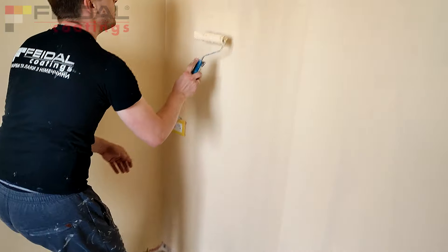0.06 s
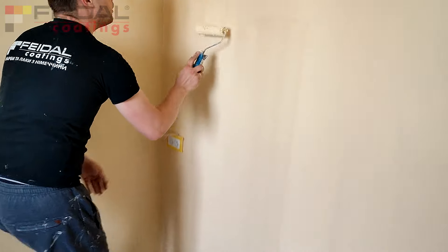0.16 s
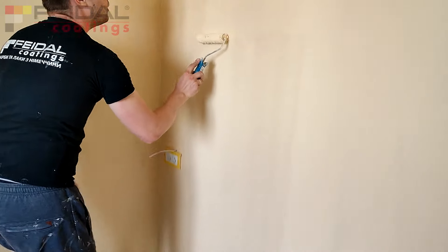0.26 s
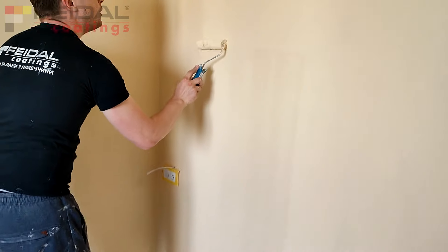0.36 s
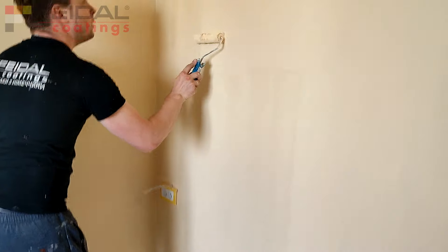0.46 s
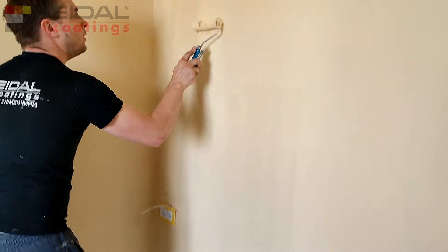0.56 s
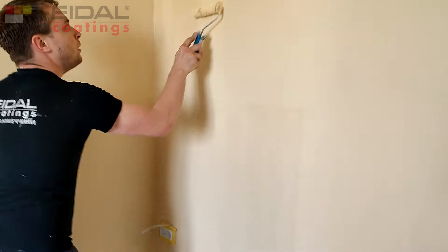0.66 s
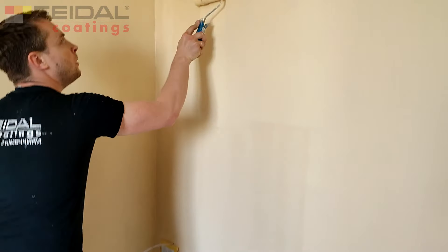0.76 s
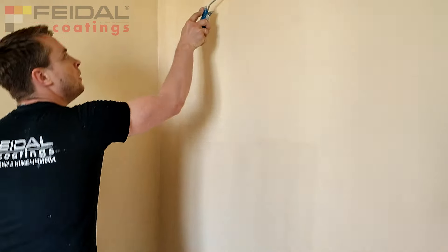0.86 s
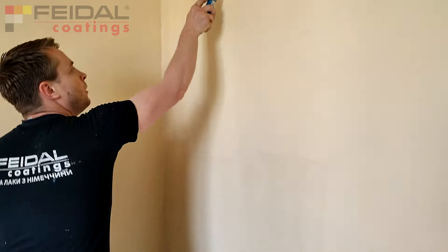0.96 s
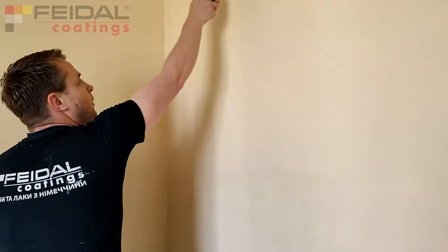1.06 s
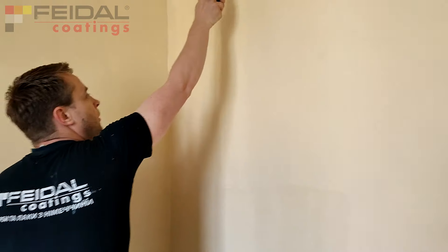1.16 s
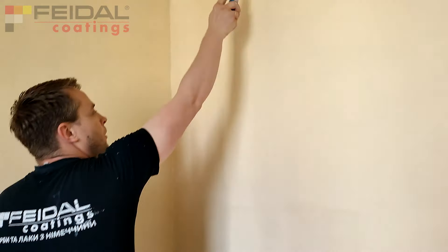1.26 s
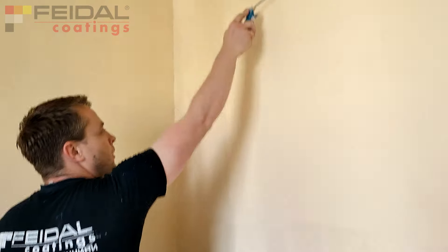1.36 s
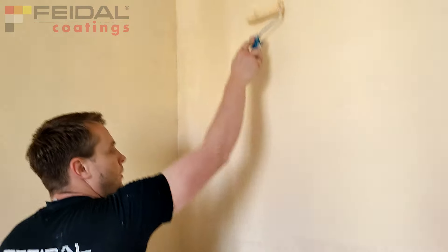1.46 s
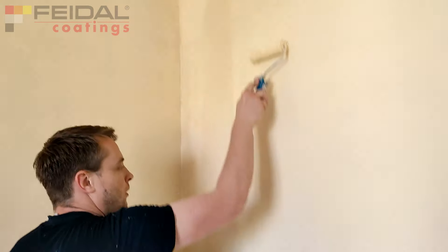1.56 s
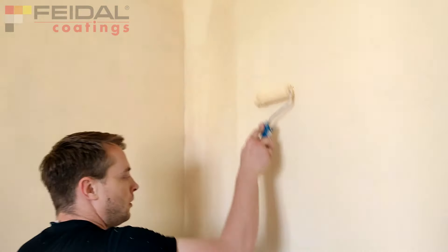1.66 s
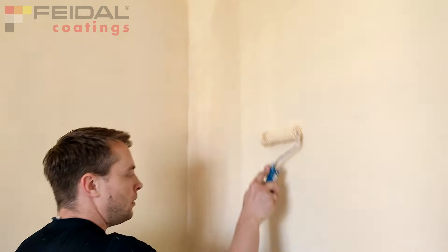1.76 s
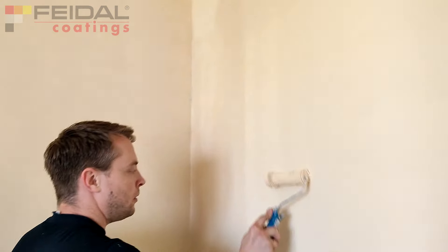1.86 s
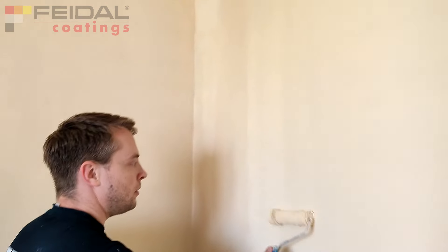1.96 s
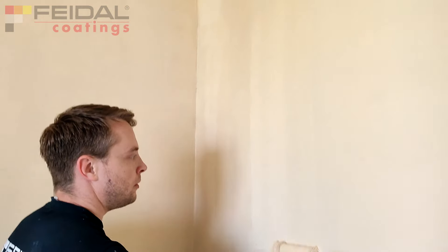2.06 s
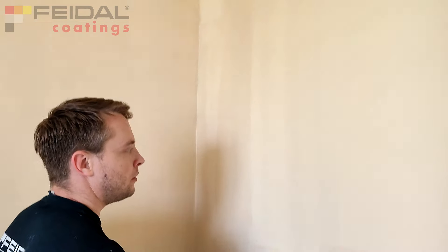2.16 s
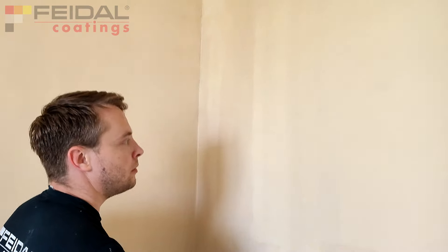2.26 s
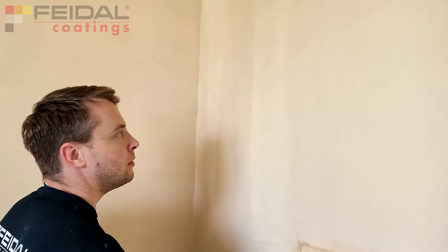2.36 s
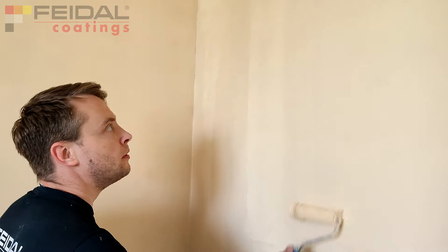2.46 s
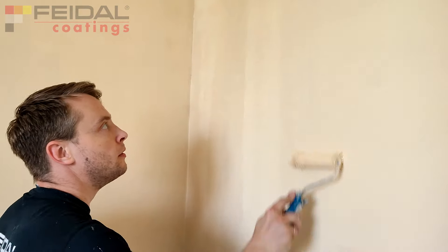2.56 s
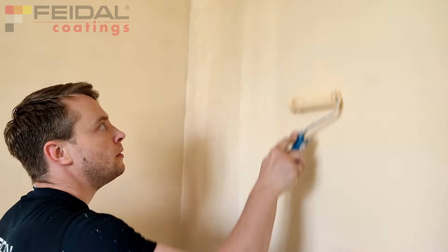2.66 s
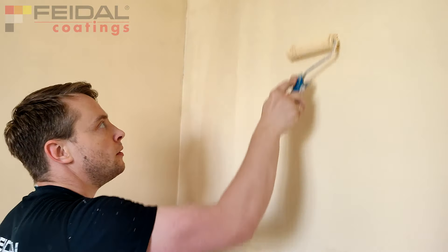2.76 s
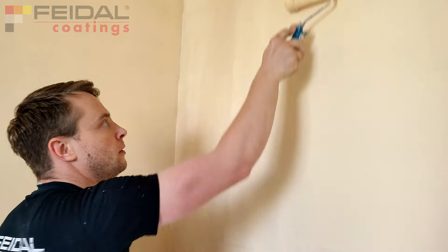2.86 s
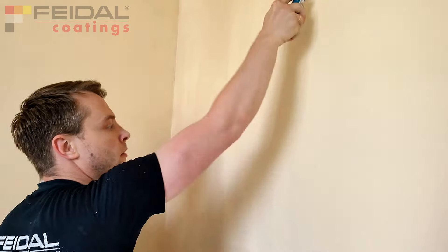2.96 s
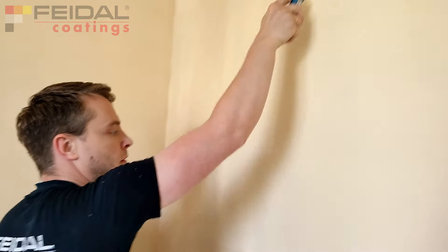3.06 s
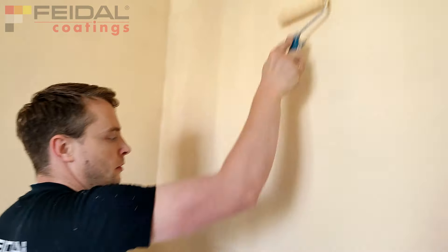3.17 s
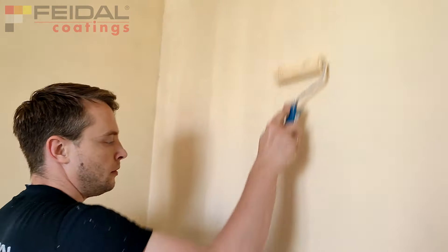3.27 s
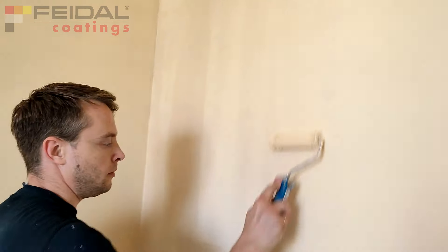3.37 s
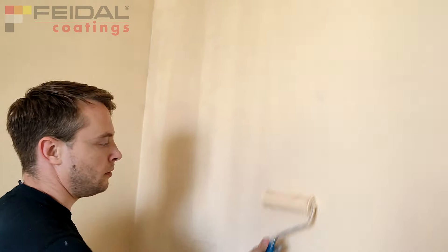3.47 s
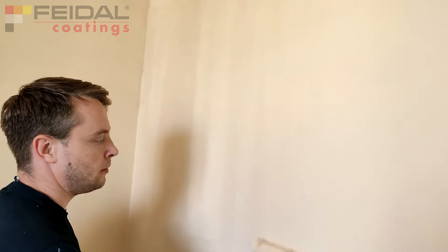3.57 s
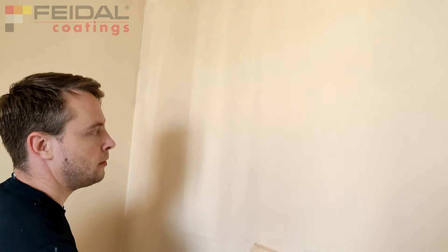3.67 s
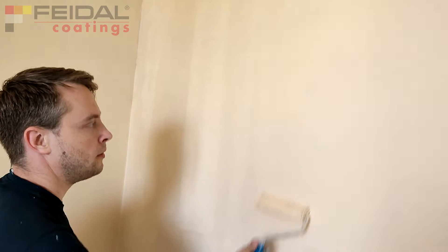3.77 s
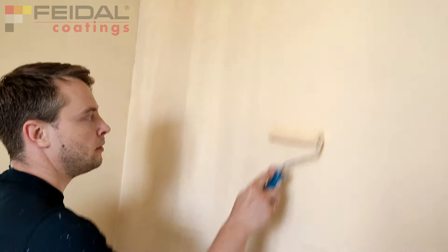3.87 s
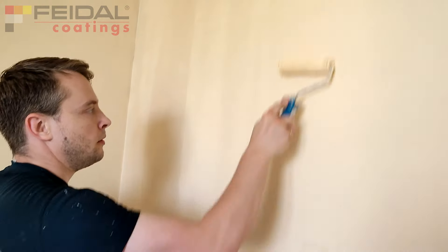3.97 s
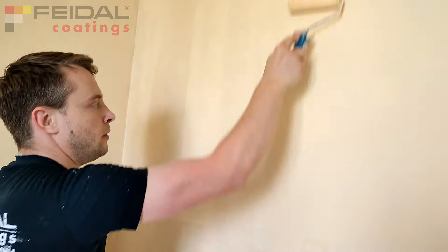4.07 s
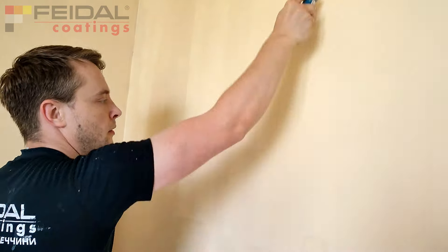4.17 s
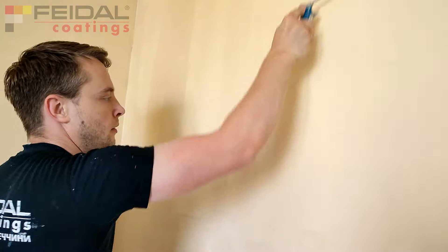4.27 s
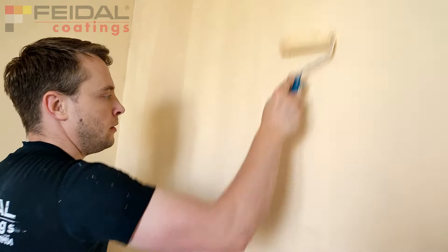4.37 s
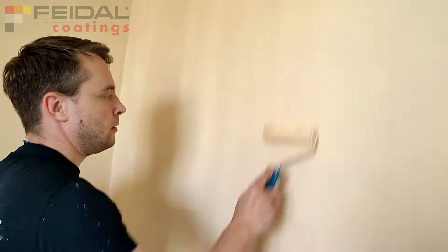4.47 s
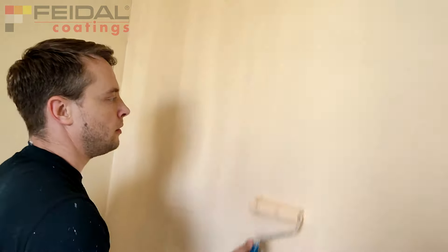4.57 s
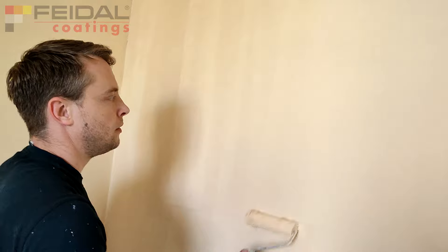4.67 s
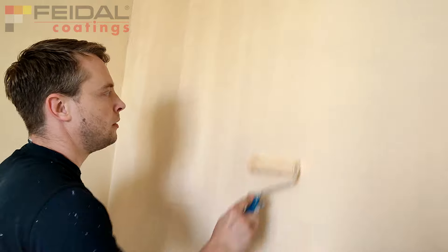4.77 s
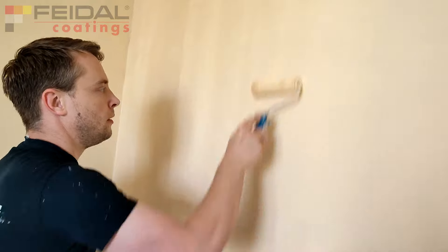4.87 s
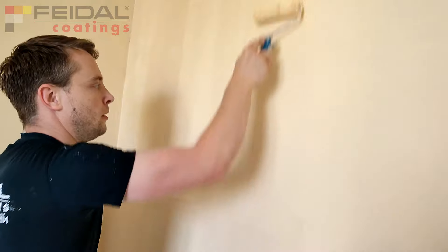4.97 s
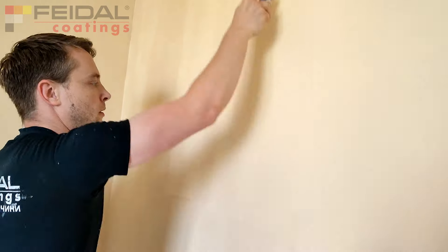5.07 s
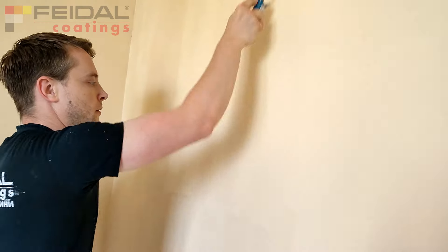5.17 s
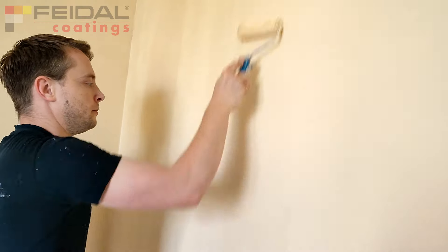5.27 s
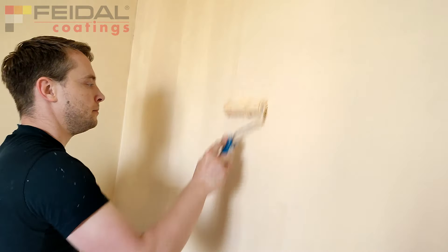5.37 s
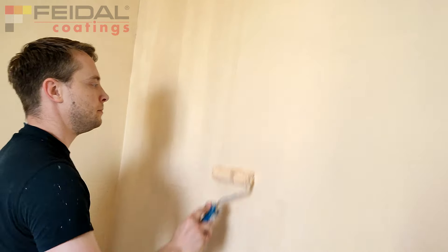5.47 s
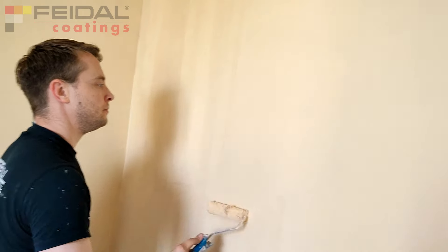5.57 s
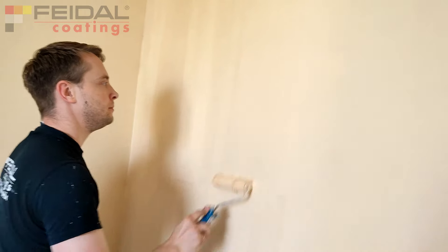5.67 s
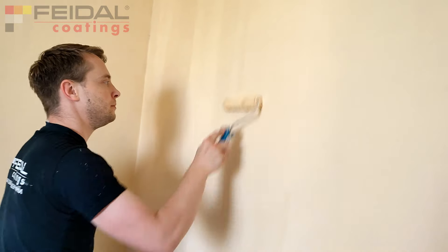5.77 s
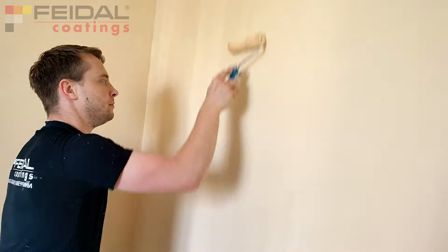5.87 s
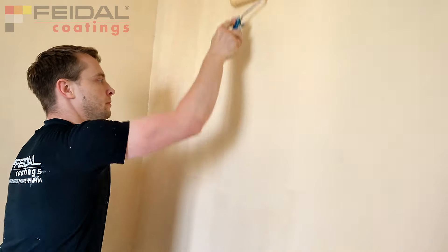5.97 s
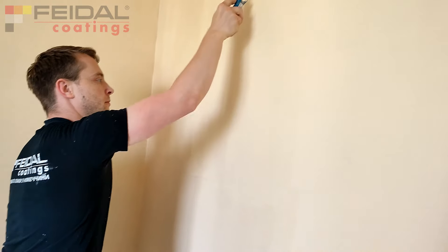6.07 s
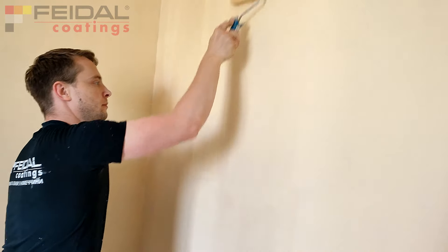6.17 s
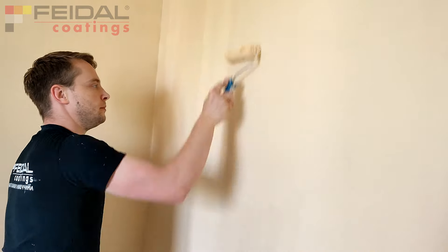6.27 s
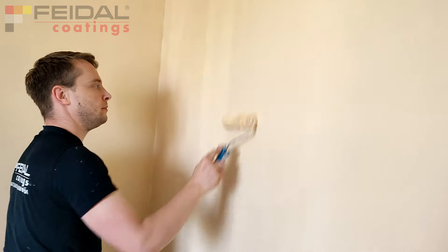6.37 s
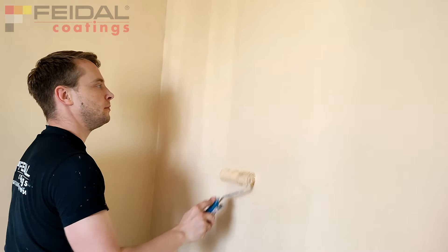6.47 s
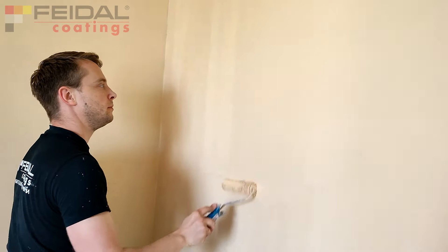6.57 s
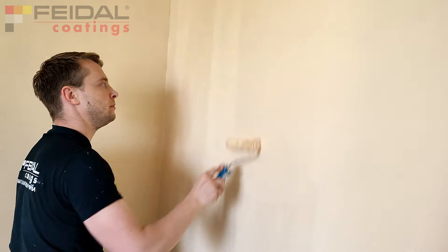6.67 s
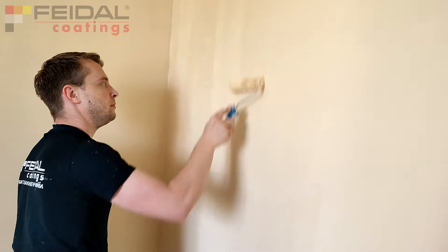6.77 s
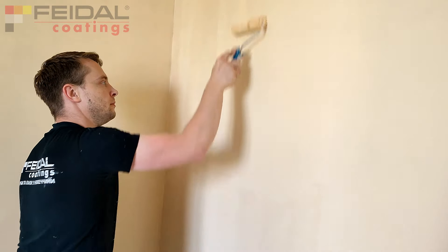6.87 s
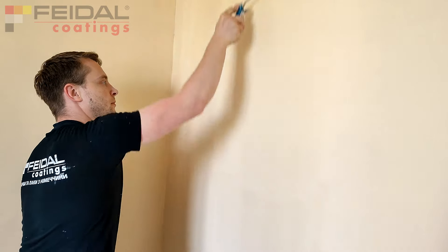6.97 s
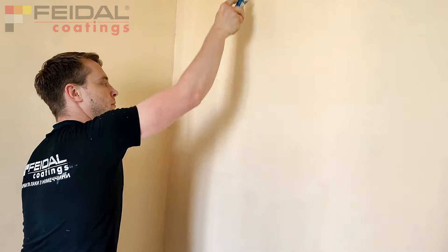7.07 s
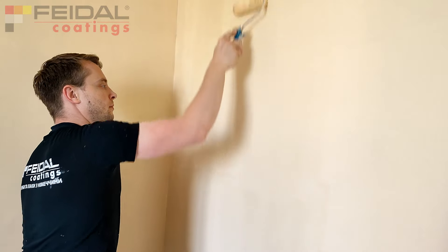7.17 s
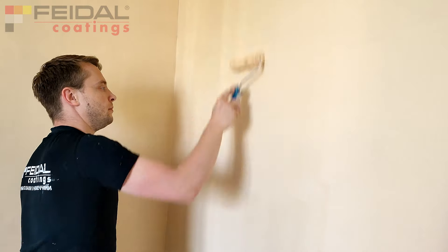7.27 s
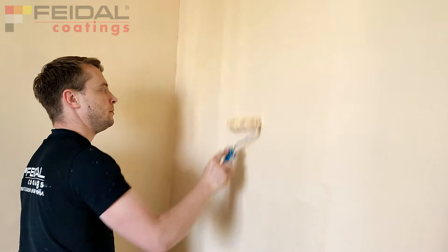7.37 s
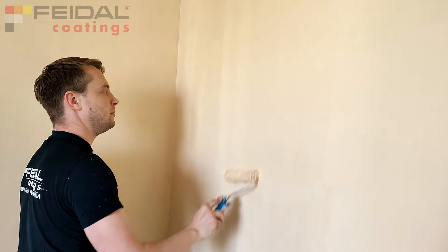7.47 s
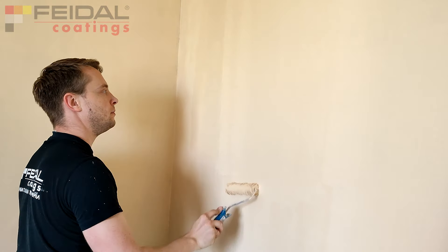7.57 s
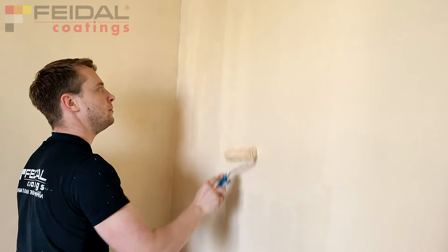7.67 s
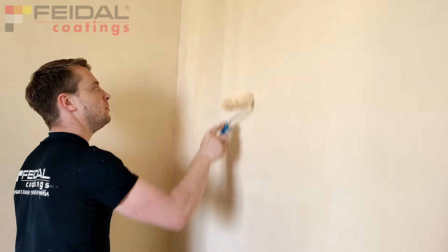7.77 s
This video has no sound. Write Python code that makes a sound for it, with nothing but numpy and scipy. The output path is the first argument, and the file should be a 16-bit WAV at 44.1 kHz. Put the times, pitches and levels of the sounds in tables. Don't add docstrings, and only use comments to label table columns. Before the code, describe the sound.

In a bare, echoing room, a small paint roller works up and down a wall close by. Slow, soft strokes come first, with a hollow knock early on; then the wet, crackling hiss turns quicker and louder, two swells a second. The wall hums and thuds low beneath, growing stronger. Another knock and a tiny tick come late. The hand-held microphone picks up the roller mainly on the right, over faint rumble and hiss.

```python
import sys
import numpy as np
from scipy import signal
from scipy.fft import rfft, irfft, next_fast_len
from scipy.io import wavfile
from scipy.ndimage import uniform_filter1d, map_coordinates

SR = 44100
rng = np.random.default_rng(int(sys.argv[2]) if len(sys.argv) > 2 else 0)


def dump(signal):
    limited = np.clip(np.atleast_2d(signal).T, -1, 1)
    pcm = np.round(limited * 32767).astype(np.int16)
    wavfile.write(sys.argv[1], SR, pcm)


def decibels_to_gain(level_db):
    exponent = np.asarray(level_db, float) / 20
    return 10 ** exponent


N = 345303


# f/Hz, level/dB (per Hz)
FIZZ_SPECTRUM = [(530, -22.5), (900, -15.5), (1260, -14), (1490, -11.5), (1810, -10), (2590, -5),
                 (4280, -5.5), (5920, -4.5), (7010, -0.5), (7440, -2), (8390, -9), (9130, -9), (11700, -6),
                 (14600, -7.5), (15800, -12)]
# f/Hz, left-right level/dB
BODY_SHADOW = [(1000, 5.5), (2500, 3.5), (5000, -0.5), (15000, -1.5)]
# t/s, left-right level/dB
PAINTER_PAN = [(0, -6), (.5, -5.5), (.8, -7), (1.6, -8.5), (2.5, -6.5), (3.2, -8.5), (3.7, -8.5),
               (4.9, -6.5), (5.1, -7.5), (5.8, -7.5), (7.83, -9)]
# t/s, top level/dB
NAP_WETNESS = [(0.3, -1.5), (2, 0), (3.3, 1), (5, -0.5), (6.4, -2), (7.6, -1)]


def fizz():
    starts, _, strength_db, _, _ = np.transpose(STROKES)
    mean_db = strength_db.mean()
    wetness_db = np.interp(starts, *np.transpose(NAP_WETNESS))
    body_strength_db = mean_db + 0.82 * (strength_db - mean_db)
    level_db = effort(strength_db, law=1.056, rest_db=-74, echo_s=0.93)
    top_db = effort(strength_db + wetness_db, law=1.01, rest_db=-75.5, echo_s=0.58, echo_db=-4.5, lead=0.93)
    body_db = effort(body_strength_db, law=0.86, rest_db=-63, echo_s=1)
    bright_db, full_db = top_db - level_db, body_db - level_db

    snaps_per_s = 4000
    snaps = (rng.random((2, N)) < snaps_per_s / SR) * rng.standard_normal((2, N))
    sound = 0.2 * unit(snaps) + patchy(patchy_db=1.0)
    sound = filtered(sound, lambda hz: decibels_to_gain(along(FIZZ_SPECTRUM, hz) + along(BODY_SHADOW, hz) * [[.5], [-.5]]))
    top = filtered(sound, lambda hz: np.clip((hz - 8200) / 1200, 0, 1))
    body = filtered(sound, lambda hz: np.clip((4200 - hz) / 1600, 0, 1))
    tilt = decibels_to_gain(bright_db - np.median(bright_db))
    fill = decibels_to_gain(full_db - np.median(full_db))
    coloured = (sound + (tilt - 1) * top + (fill - 1) * body) / np.std(sound)

    pan_db = over_time(PAINTER_PAN)
    sides = decibels_to_gain(np.array([pan_db, -pan_db]) / 2)
    flutter = decibels_to_gain(0.34 * wobble(14))
    return decibels_to_gain(level_db + 4.0) * flutter * sides * coloured


# start t/s, end t/s, fizz level/dB at full speed,
# share of the swing already done on landing [0-1], rumble level/dB
STROKES = [(0.295, 1.225, -48, 0.07, -64), (1.29, 1.58, -63, 0.03, -57), (1.42, 2.283, -45.5, 0.02, -56.5),
           (2.348, 3.11, -46, 0.13, -58.5), (3.049, 3.74, -45, 0.05, -59.5),
           (3.688, 4.27, -45.5, 0.1, -57.5), (4.226, 4.715, -41.5, 0.02, -54.5),
           (4.69, 5.137, -41.5, 0.07, -54.5), (5.129, 5.66, -42, 0.04, -52.5),
           (5.617, 6.177, -42.5, 0.1, -52.5), (6.145, 6.643, -41, 0.04, -54.5),
           (6.612, 7.117, -41, 0.05, -55.5), (7.115, 7.641, -41, 0.01, -56.5),
           (7.613, 8.103, -42, 0.05, -58.5)]


def effort(peaks_db, law, rest_db, echo_s, echo_db=-2.5, lead=1):
    t = np.arange(0, N / SR, .001)
    power = np.zeros(len(t))
    for (start, end, _, landed, _), db in zip(STROKES, peaks_db):
        u = (t - start) / (end - start)
        swing = landed + (1 - landed) * np.abs(u) ** lead
        speed = np.abs(np.sin(np.pi * swing))
        power += ((u >= 0) & (u < 1)) * decibels_to_gain(2 * db) * speed ** (2 * law)
    fade = decibels_to_gain(-120 * t / echo_s)
    echo = signal.fftconvolve(power, fade / fade.sum())[:len(t)]
    total = power + decibels_to_gain(2 * echo_db) * np.abs(echo) + decibels_to_gain(2 * rest_db)
    return np.interp(np.arange(N) / SR, t, 10 * np.log10(total))


# f/Hz, level/dB (per Hz)
ROLL_SPECTRUM = [(120, -12), (190, -4.5), (310, -1), (545, -6.5), (880, -6), (1240, -16), (2000, -17.5),
                 (4000, -44)]
# f/Hz, level/dB
MIDDLE_MODES = [(90, 0.5), (108, -4.5)]
UPPER_MODES = [(133, -0.5), (150, -7.5), (172, -12.5)]


def drumming():
    low_db, middle_db, upper_db = leaning()
    roll_db = effort(np.transpose(STROKES)[4], law=1, rest_db=-66, echo_s=2.3)
    lowest_hz = 49.4
    t = np.arange(N) / SR

    def hum(hz, drift):
        return np.sqrt(2) * np.sin(2 * np.pi * hz * t + drift * wobble(9))

    def group(modes):
        return unit(sum(decibels_to_gain(db + 3.0 * wobble(12)) * hum(hz, drift=1.3) for hz, db in modes))

    modes = decibels_to_gain(low_db) * hum(lowest_hz, drift=0.97)
    modes = modes + decibels_to_gain(middle_db) * group(MIDDLE_MODES) + decibels_to_gain(upper_db) * group(UPPER_MODES)
    apart = 0.064 * decibels_to_gain(upper_db) * group(UPPER_MODES) + 0.22 * decibels_to_gain(low_db) * hum(lowest_hz, drift=1.5)
    rumble = unit(resonant(spread(patchy(patchy_db=1.5), ROLL_SPECTRUM)))
    rumble = decibels_to_gain(roll_db + 0.6 + 1.64 * wobble(25)) * rumble
    return modes * decibels_to_gain([[-.3], [.3]]) + apart * [[1], [-1]] + rumble


# middle t/s, length t/s, lowest level/dB, middle level/dB, upper level/dB
LEANS = [(0.34, 0.098, -58, -57, -54.5), (.52, .2, -68, -57, -62), (0.88, 0.82, -62, -64.5, -64.5),
         (1.432, 0.17, -60, -55, -60.5), (1.89, 0.8, -63.5, -65, -64.5), (2.403, 0.16, -55, -67, -53),
         (2.6, 0.27, -59.5, -66, -59), (3.36, 0.48, -58.5, -59.5, -69), (3.903, 0.44, -64, -62, -74),
         (4.467, 0.19, -49.5, -51, -59), (4.668, 0.18, -56, -53.5, -58.5), (4.914, 0.36, -53, -53.5, -65),
         (2.92, .25, -61, -74, -65), (5.402, 0.26, -48.5, -44.5, -52.5), (5.57, 0.17, -49, -57, -59),
         (5.916, 0.51, -51, -50, -61.5), (6.37, 0.17, -54, -47.5, -57), (6.543, 0.17, -60, -50.5, -55),
         (6.853, 0.36, -48.5, -52.5, -62), (7.206, 0.26, -62, -56, -68), (7.475, 0.34, -46.5, -52, -49),
         (7.764, 0.22, -52, -47, -58)]
WALL_REST = [-81.5, -71, -76]


def leaning():
    t = np.arange(N) / SR
    power = decibels_to_gain(2 * np.array(WALL_REST))[:, None] * np.ones(N)
    for s, length, *db in LEANS:
        near = slice(max(round((s - length) * SR), 0), round((s + length) * SR))
        swell = np.cos(np.pi * (t[near] - s) / length / 2) ** 4
        power[:, near] += decibels_to_gain(2 * np.array(db))[:, None] * swell
    return 10 * np.log10(power)


# f/Hz, width f/Hz, boost level/dB
ROOM_RESONANCES = [(192.5, 5.5, 11), (243, 8.3, 2), (286.3, 5.8, 9.5), (315, 9.6, 2.5), (347, 3.6, 10.5),
                   (414, 10.7, 6), (473, 15, 3), (695, 16.5, 5.5)]


def resonant(x):
    def gain(hz):
        peaks = [decibels_to_gain(2 * db) / (1 + (2 * (hz - centre) / width) ** 2) for centre, width, db in ROOM_RESONANCES]
        return np.sqrt(1 + sum(peaks))
    return filtered(x, gain)


# t/s, peak level/dB, t60 t/s, click level/dB, blow level/dB
FRAME_KNOCKS = [(0.58, -55, 0.4, 8, 6.5), (0.715, -32, 1, -18, 2.5), (1.058, -40.5, 1.17, -3, -5),
                (1.325, -47, 0.4, -3, -6), (1.358, -45, 0.51, -8, 4), (2.33, -48, 0.4, -10, 0),
                (4.66, -46.5, 0.4, -22, 4), (2.956, -59, 0.43, 22.5, 3), (3.507, -64, 0.3, 1, -5),
                (5.192, -51, 0.4, -4, 1), (5.851, -35.5, 0.46, -1, -1), (5.956, -54, 0.64, 12, 6)]
# f/Hz, level/dB (per Hz)
HOLLOW_SPECTRUM = [(200, -31), (330, -5.5), (450, -7.5), (670, -2.5), (1000, -6), (1450, -14.5),
                   (2500, -15), (6000, -50)]
# f/Hz, level/dB (per Hz)
CLICK_SPECTRUM = [(800, -33), (1500, -6), (2500, -4), (4500, -12), (7000, -35), (12000, -55)]


def knocks():
    out = np.zeros((2, 2, N + SR))
    t = np.arange(SR // 2) / SR
    for s, db, t60, click_db, blow_db in FRAME_KNOCKS:
        blow = decibels_to_gain(blow_db - 60 * t / 0.051)
        tail = decibels_to_gain(-60 * t / t60) * (1 - np.exp(-t / 0.02))
        parts = decibels_to_gain([[[db]], [[db + click_db]]]) * rng.standard_normal((2, 2, len(t)))
        at = round(s * SR)
        out[..., at:at + len(t)] += (blow + tail) * parts

    def colour(x, tone):
        return spread(x, tone) / np.std(spread(rng.standard_normal((2, N)), tone))

    hollow, click = out[..., :N]
    return decibels_to_gain([[-8], [-6]]) * (colour(hollow, HOLLOW_SPECTRUM) + colour(click, CLICK_SPECTRUM))


# t/s, spike level/dB, push level/dB
DROPLET = (6.32155, -8, -15.5)


def tick():
    s, spike_db, push_db = DROPLET
    t = np.arange(N) / SR - s

    def edge(at):
        return 1 / (1 + np.exp(-np.clip((t - at) / .00005, -50, 50)))

    spike = -decibels_to_gain(spike_db) * np.exp(-(t / .00003) ** 2)
    ripple = 1 - .3 * np.sin(2 * np.pi * 1800 * t + .5)
    push = (edge(.0002) - edge(.0012)) * ripple
    recovery = -.35 * edge(.0012) * np.exp(-np.abs(t) / .005)
    return np.array([0 * t, spike + decibels_to_gain(push_db) * (push + recovery)])


# f/Hz, level/dB (per Hz)
QUIET_SPECTRUM = [(4.7, -33), (8.0, 6.5), (20, -5.5), (69, -17), (98, -7.5), (204, -18), (239, -7.5),
                  (272, -32.5), (621, -45), (909, -32), (1170, -22.5), (6940, -34.5), (15800, -68)]


def room_tone():
    drift_db = 1.2 * wobble(3)
    return decibels_to_gain(-56.5 + drift_db) * unit(spread(patchy(patchy_db=2.0), QUIET_SPECTRUM))


# f/Hz, correlation [0-1]
LIKENESS = [(60, 0.38), (250, 0.97), (500, 0.69), (1000, 0.15), (3000, 0.12)]


def spread(pair, spectrum):
    def response(hz):
        turn = np.arccos(np.clip(along(LIKENESS, hz), -1, 1)) / 2
        return decibels_to_gain(along(spectrum, hz)) * [np.cos(turn), np.sin(turn)]
    mid, side = filtered(pair, response)
    return np.array([mid + side, mid - side])


def patchy(patchy_db):
    z = signal.stft(rng.standard_normal((2, N)), nperseg=512)[2]
    field = uniform_filter1d(rng.standard_normal(z.shape[1:]), size=6, axis=0)
    field = uniform_filter1d(field, size=10, axis=1)
    return signal.istft(z * decibels_to_gain(patchy_db * unit(field)), nperseg=512)[1][:, :N]


def unit(x):
    return x / np.sqrt(np.mean(x ** 2) + 1e-20)


def along(points, hz):
    f, v = np.transpose(points)
    return np.interp(np.log(hz + 1), np.log(f + 1), v)


def over_time(points):
    return np.interp(np.arange(N) / SR, *np.transpose(points))


def wobble(rate):
    knots = rng.standard_normal(int(N * rate / SR) + 4)
    return map_coordinates(knots, [np.arange(N) * rate / SR])


def filtered(x, response):
    m = next_fast_len(N + SR // 2)
    return irfft(rfft(x, m) * response(np.fft.rfftfreq(m, 1 / SR)), m)[..., :N]


def scene():
    return fizz() + drumming() + knocks() + tick() + room_tone()


# f/Hz, share of time lost [0-1]
DROPOUTS = [(2500, 0), (3500, .04), (6000, .015), (7700, .03), (8100, .3), (9500, .25), (10200, .02),
            (15000, .02)]


def holes(x):
    hz, _, z = signal.stft(x, SR, nperseg=1024)
    field = uniform_filter1d(rng.standard_normal(z.shape[1:]), size=6, axis=0)
    field = uniform_filter1d(field, size=4, axis=1)
    rank = np.argsort(np.argsort(field, axis=1), axis=1) / field.shape[1]
    gain = np.where(rank < along(DROPOUTS, hz)[:, None], .03, 1)
    return signal.istft(z * gain, SR, nperseg=1024)[1][:, :N]


def roll_off(x):
    return signal.sosfilt(signal.butter(12, 16000, fs=SR, output="sos"), x)


def record(dry):
    mix = filtered(holes(dry), lambda hz: hz < 15500)
    return roll_off(mix)


dry = scene()
out = record(dry)
dump(out)
```